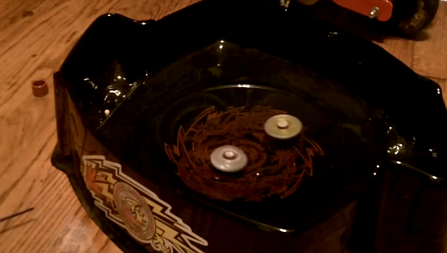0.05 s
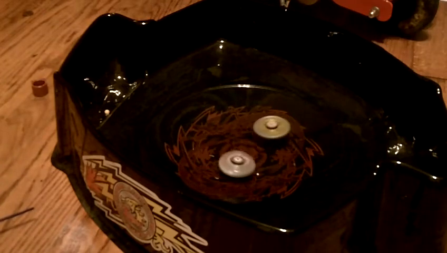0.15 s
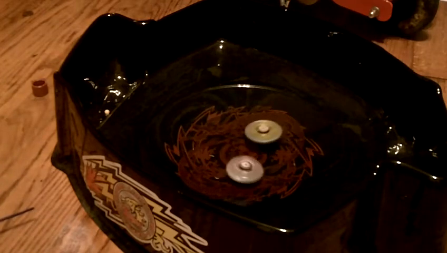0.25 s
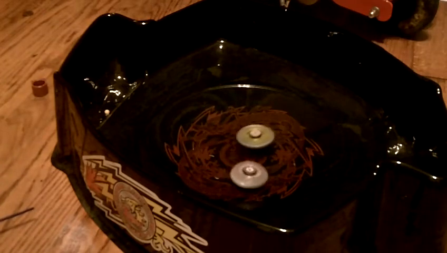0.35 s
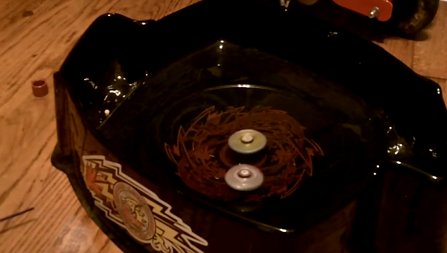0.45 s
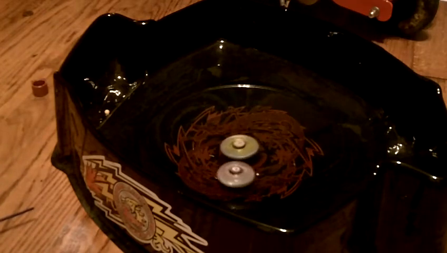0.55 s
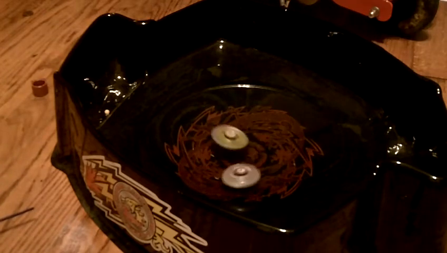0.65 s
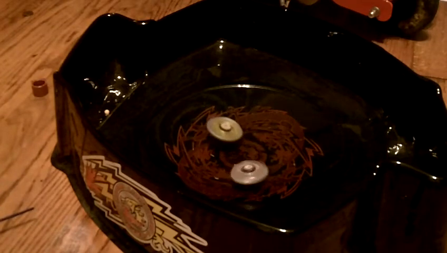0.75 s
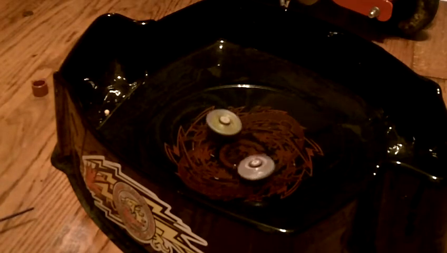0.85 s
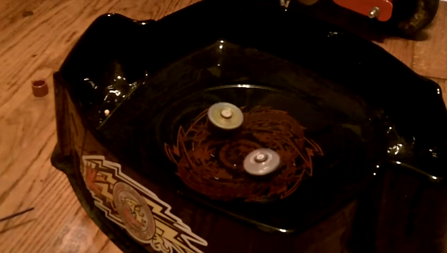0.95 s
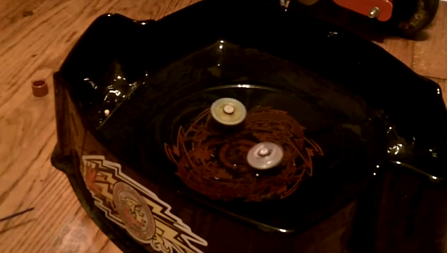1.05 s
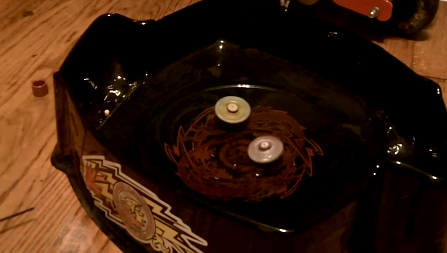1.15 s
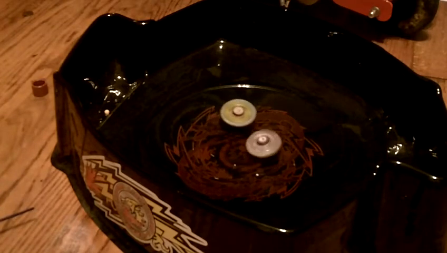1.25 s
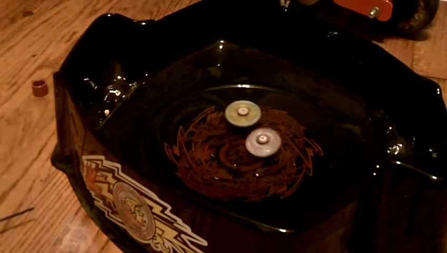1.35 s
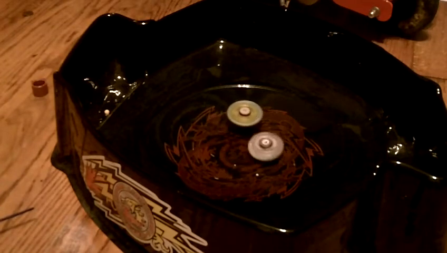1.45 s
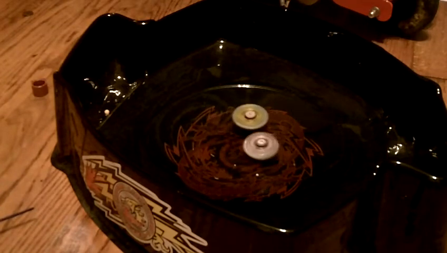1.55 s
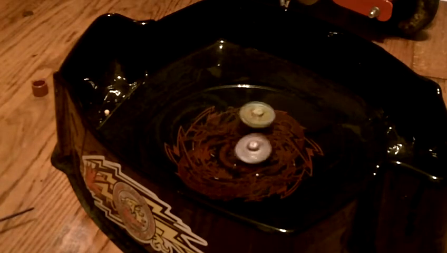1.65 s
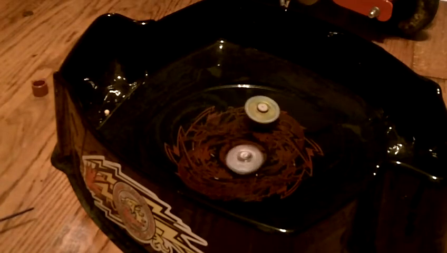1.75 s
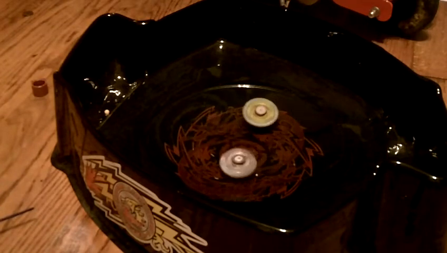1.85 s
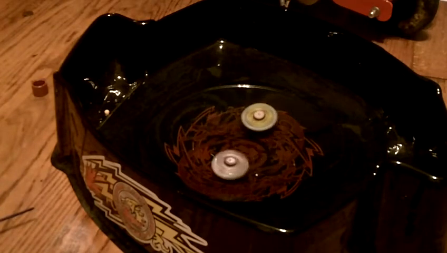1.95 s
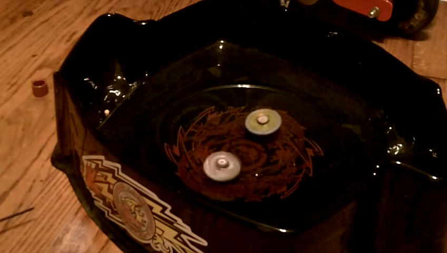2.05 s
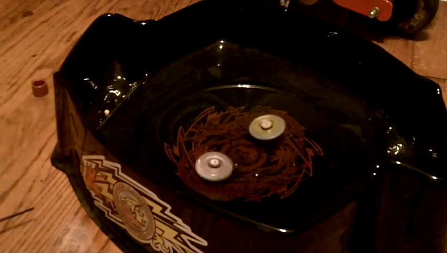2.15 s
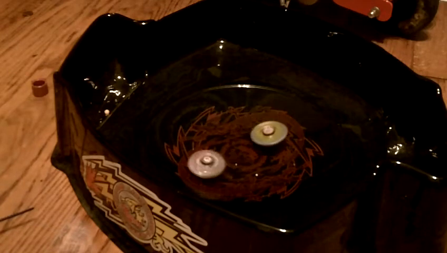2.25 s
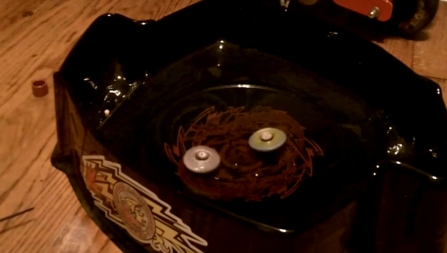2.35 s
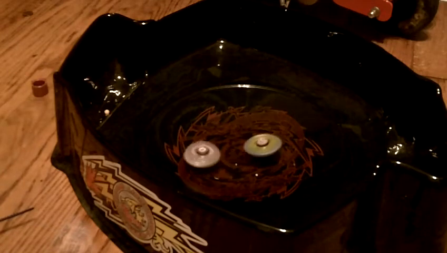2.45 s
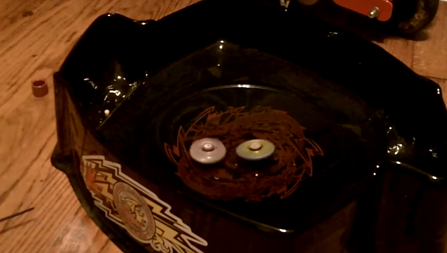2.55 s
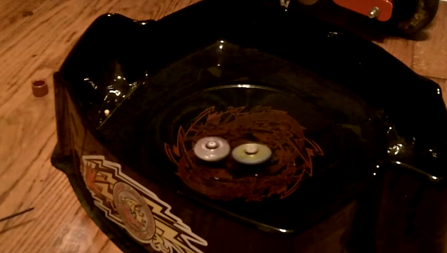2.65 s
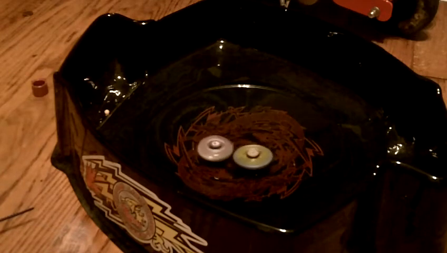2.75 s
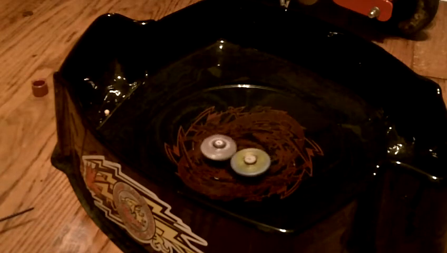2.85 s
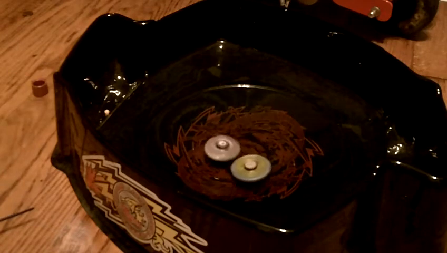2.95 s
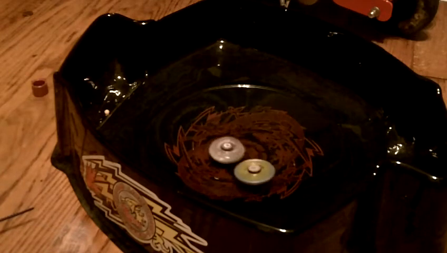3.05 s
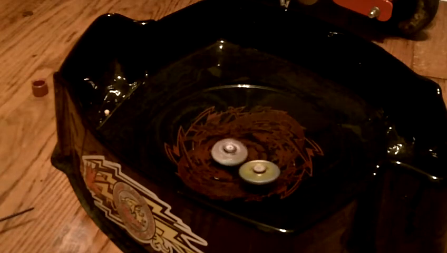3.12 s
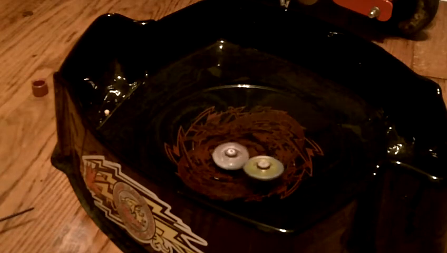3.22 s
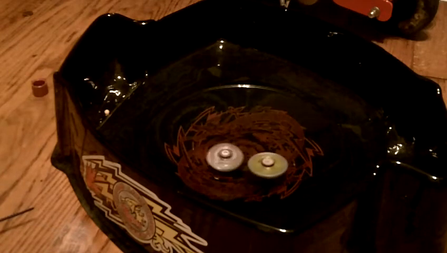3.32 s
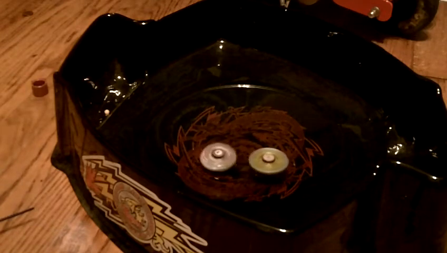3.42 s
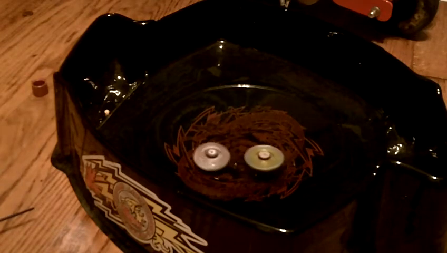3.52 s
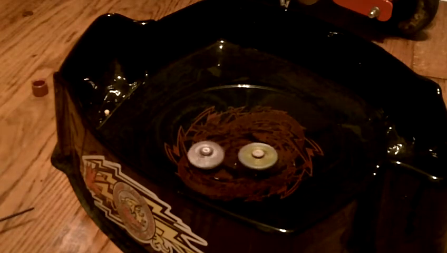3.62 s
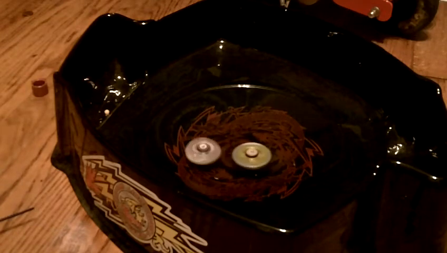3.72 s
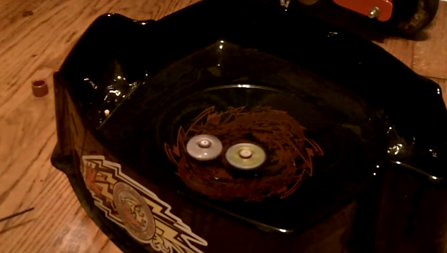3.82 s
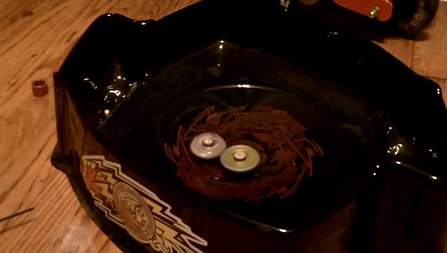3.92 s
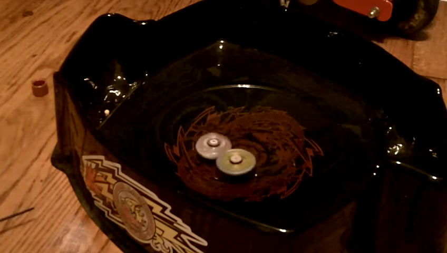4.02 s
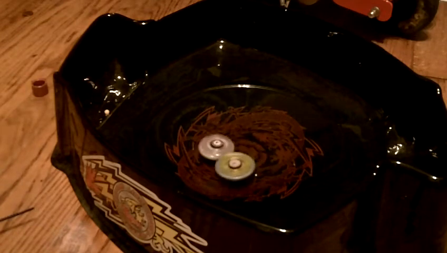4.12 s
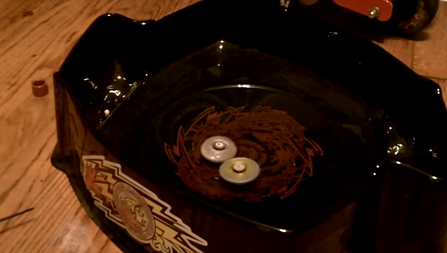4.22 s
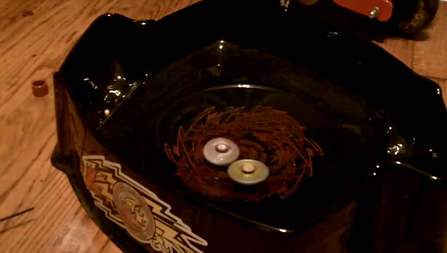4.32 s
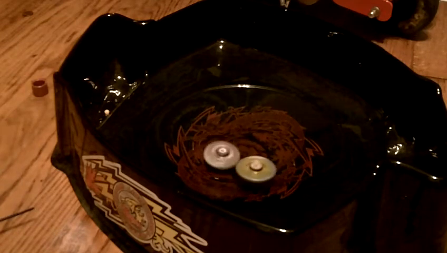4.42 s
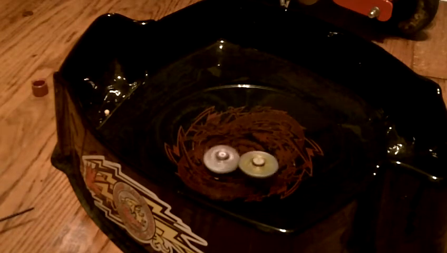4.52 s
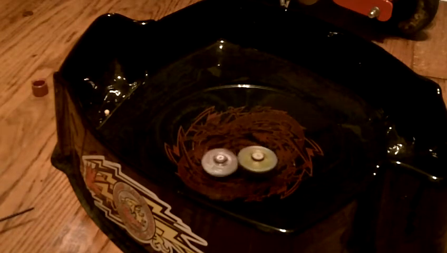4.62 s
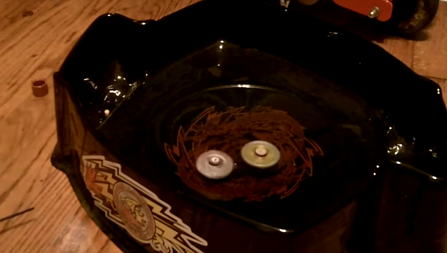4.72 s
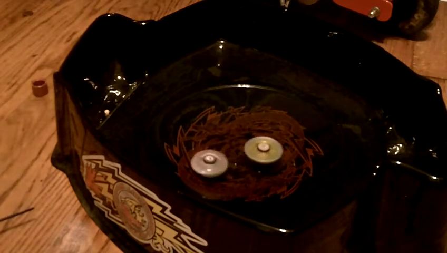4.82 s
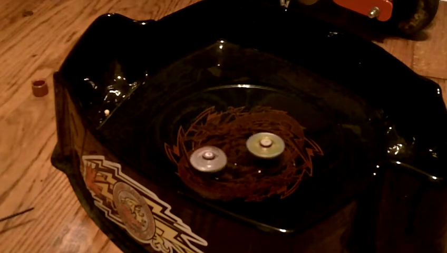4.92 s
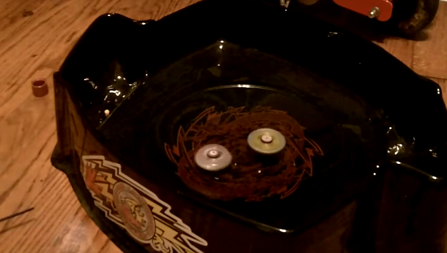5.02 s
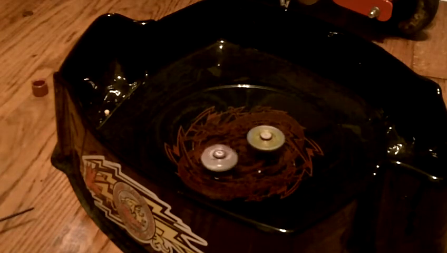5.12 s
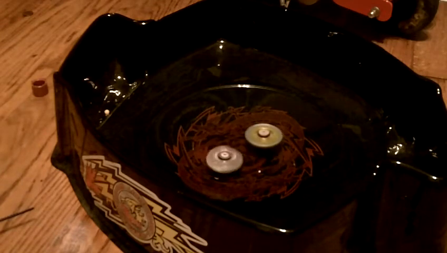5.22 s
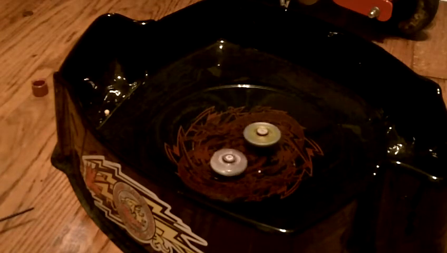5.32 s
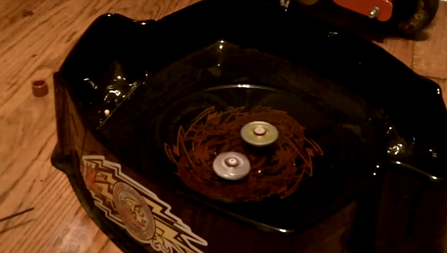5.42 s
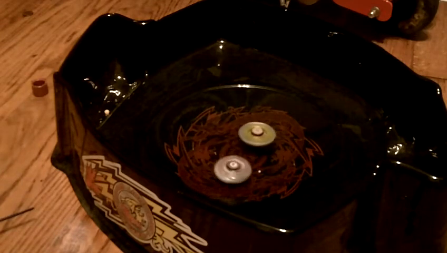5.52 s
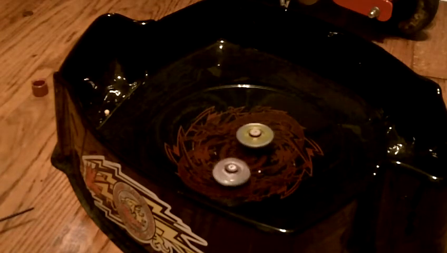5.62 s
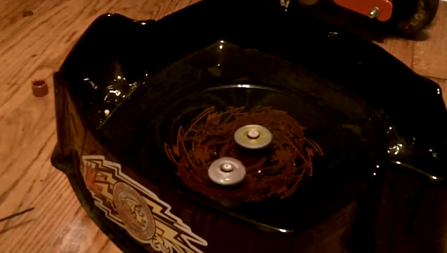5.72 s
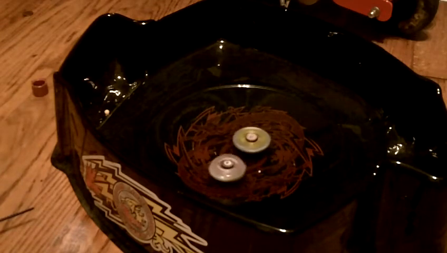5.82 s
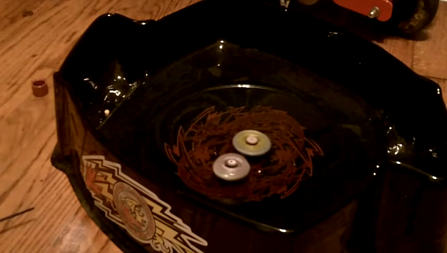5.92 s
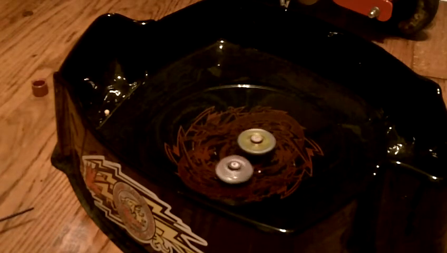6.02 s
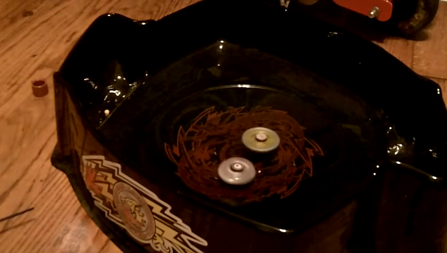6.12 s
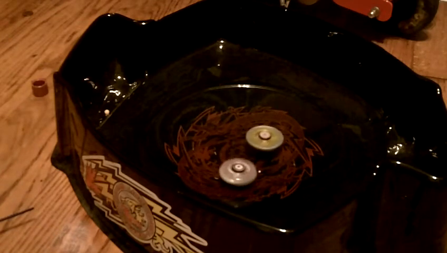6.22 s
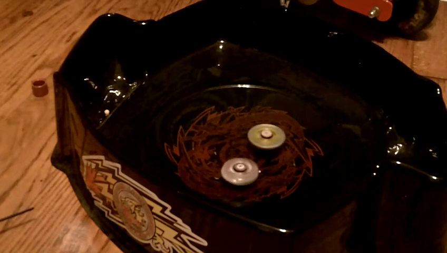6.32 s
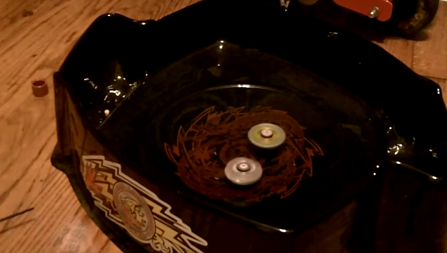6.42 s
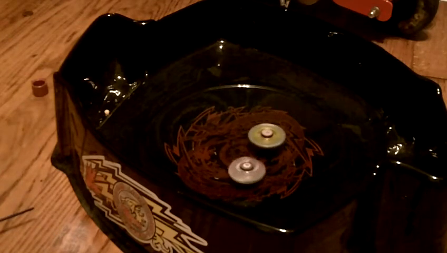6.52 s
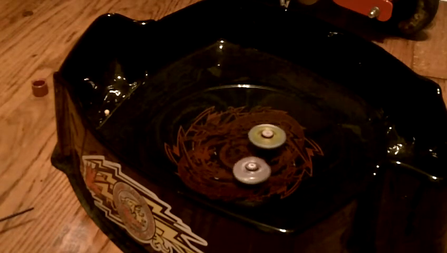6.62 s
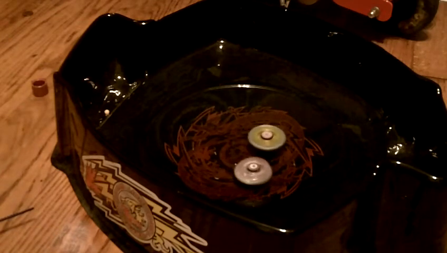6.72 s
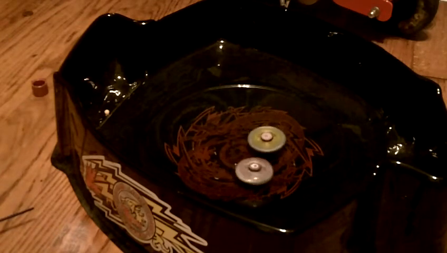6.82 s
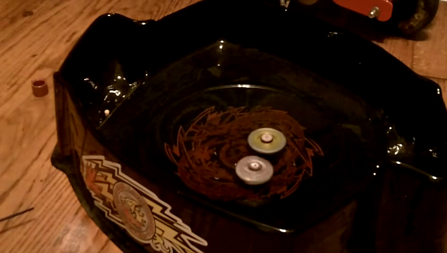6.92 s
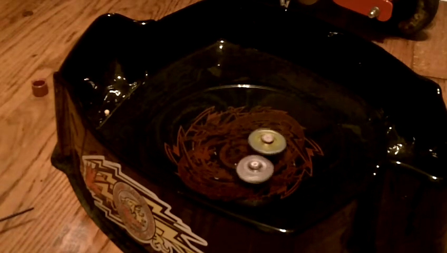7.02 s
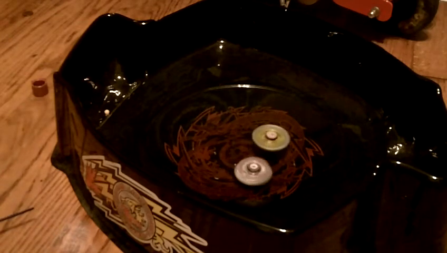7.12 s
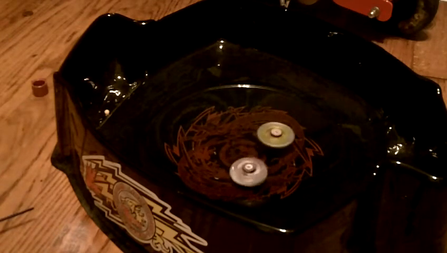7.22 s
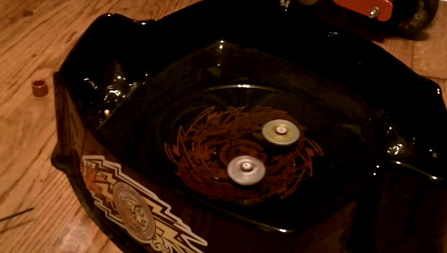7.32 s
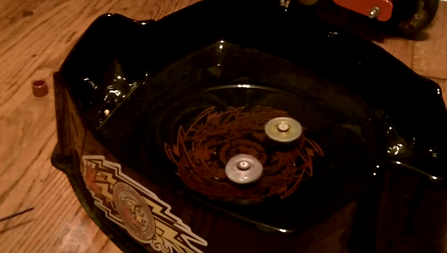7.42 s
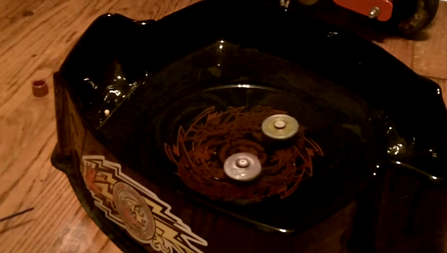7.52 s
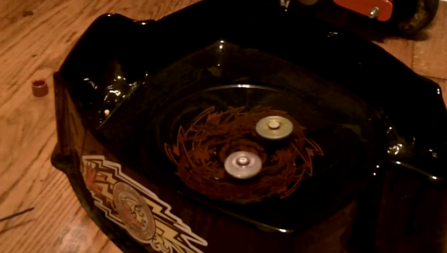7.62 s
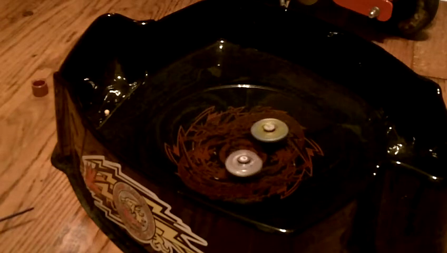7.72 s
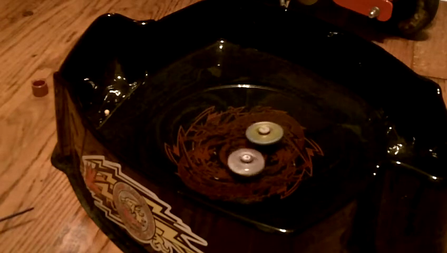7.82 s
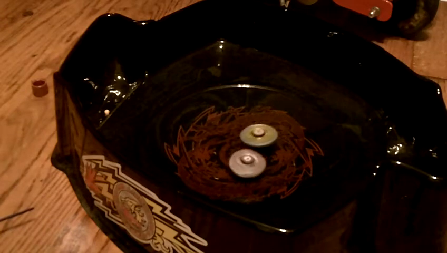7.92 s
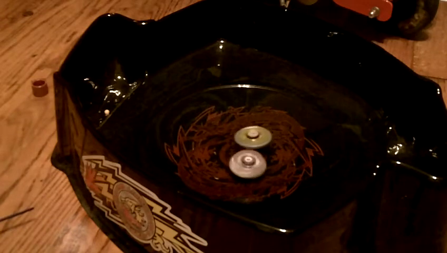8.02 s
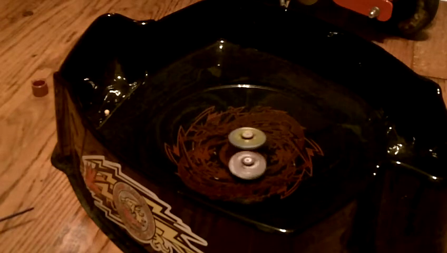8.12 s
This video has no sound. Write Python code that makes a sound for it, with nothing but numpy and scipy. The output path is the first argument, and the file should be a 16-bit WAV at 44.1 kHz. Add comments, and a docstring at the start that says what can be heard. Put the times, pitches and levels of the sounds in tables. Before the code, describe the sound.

Two metal spinning tops whirr and tick on a thin plastic arena, colliding repeatedly with sharp, ringing clacks as the whirr softens.

```python
"""In a thin plastic arena on a wooden floor, two metal tops spin close to a small camera.
Friction at their tips drives the modes of the arena, which scrapes, drums and ticks. When the rims
meet, the impact gives a clack, a metal ring of split modes and a hollow thud; a thrown top lands
again with duller knocks. Beneath lie room noise, house rumble and the camera's faint buzz."""
import sys
import numpy as np
from scipy import signal
from scipy.fft import rfft, irfft
from scipy.io import wavfile
from scipy.ndimage import uniform_filter1d

SR = 44100
rng = np.random.default_rng(int(sys.argv[2]) if len(sys.argv) > 2 else 0)


def unload_wav(signal):
    """Save mono or channel-first audio to the path in sys.argv[1] as 16-bit WAV at rate SR, clipped to [-1, 1]."""
    wavfile.write(
        sys.argv[1],
        SR,
        np.round(np.clip(np.atleast_2d(signal).T, -1, 1) * 32767).astype(np.int16),
    )


N = 359856

# high modes of the arena: pitch_hz, width_hz, level_db
ARENA_MODES = [(929, 200, -6), (1274, 76, -1), (1392, 92, -2.5), (1563, 42, 1), (1707, 240, -4.5),
               (2103, 600, -6), (3070, 480, -4.5), (3427, 290, -9.5), (3784, 460, -9.5), (4430, 790, -10.5),
               (5800, 340, -34.5)]
# louder catches of a tip on a ridge: start_s, level_db, low_over_high_db, low_hz, high_hz
LOUD_CATCHES = [(0.0423, -37.5, -9.5, 1440, 3640), (0.138, -44, -8, 1600, 3460),
                (0.256, -44, -2, 1470, 3000), (0.298, -47, 4, 1500, 3200), (0.3528, -42.5, -2, 1500, 3010),
                (0.4622, -43, -1.5, 1350, 4030), (0.5146, -39.5, -4.5, 1380, 2950),
                (0.5678, -45, 7, 1220, 3420), (0.8842, -42.5, -13, 1270, 3500),
                (0.9419, -33.5, -11, 1600, 3590), (1.02, -45, -2, 1570, 3250),
                (1.1313, -47, -2, 1580, 3910), (1.8594, -43.5, -1, 1480, 3130),
                (2.0328, -50, -4, 1720, 3240), (2.0812, -47, -3, 1750, 3470), (2.1114, -43, -2, 1550, 4400),
                (2.2625, -43, -1, 1570, 3000), (2.337, -43.5, -8, 1700, 3800),
                (2.4109, -46, -8, 1570, 3500), (2.6348, -52, 5, 1690, 3320),
                (3.0302, -39, -0.5, 1530, 4050), (3.1122, -47.5, 4, 1880, 3420),
                (3.5065, -41, 3, 1720, 3840), (3.5882, -48, 1.5, 1620, 4030),
                (3.8678, -44.5, -0.5, 1280, 3840), (3.9936, -48.5, 2, 1540, 4120),
                (4.2961, -44, -10, 1260, 4290), (4.5049, -46.5, -1, 1253, 3090),
                (4.81, -40, -3.5, 1726, 3240), (4.8894, -41.5, -1.5, 1550, 3290),
                (4.9677, -45.5, -5, 1535, 3360), (5.176, -47, 3.5, 1775, 3500),
                (5.4274, -49, 6, 1537, 3470), (5.463, -44, 2.5, 1594, 3200), (5.5374, -43, -1, 1535, 3230),
                (5.7556, -46, 0, 1457, 3730), (6.2707, -53, 5.5, 1553, 3950),
                (6.4987, -38, -2.5, 1512, 3100), (6.5906, -50, 4, 1530, 4120),
                (6.6091, -41.5, 1, 1430, 3870), (6.7194, -38, -3.5, 1528, 3020),
                (6.816, -43.5, -4, 1556, 2970), (6.9721, -47.5, -4, 1710, 3200),
                (7.2574, -46.5, -1, 1534, 3340), (7.3447, -41.5, -7, 1970, 3460),
                (7.4964, -47.5, -5, 1557, 4200), (7.6475, -45.5, -6, 1570, 3820),
                (7.7319, -43, -0.5, 1706, 3290), (7.7675, -42, -1, 1536, 4400),
                (8.106, -43.5, -3, 1203, 3300)]
# spin of the first top: time_s, turns_per_s
SPIN = [(0, 27), (8.16, 22)]
SPIN_RATIOS = (1, .83)  # the second top turns slower


def gain_of(db):
    return 10 ** (np.asarray(db) / 20)


def unit_rms(x):
    return x / np.sqrt(np.mean(x ** 2) + 1e-20)


def smoothed(noise, samples):
    return unit_rms(uniform_filter1d(noise, samples))


def add(mix, start_s, sound):
    part = mix[round(start_s * SR):][:len(sound)]
    part += sound[:len(part)]


def coloured(x, spectrum):
    """Spectral shaping by (frequency_hz, level_db) points, at unit rms."""
    points_hz, db = np.transpose(spectrum)
    hz = np.fft.rfftfreq(len(x), 1 / SR)
    gain = gain_of(np.interp(np.log(hz + 1), np.log(points_hz + 1), db))
    return unit_rms(irfft(rfft(x) * gain, len(x)))


def resonate(x, hz, width_hz):
    """Two-pole resonance of gain 1 at its centre."""
    return signal.lfilter(*signal.iirpeak(hz, hz / width_hz, SR), x)


def resonate_twice(x, hz, width_hz):
    return resonate(resonate(x, hz, width_hz), hz, width_hz)


def driven_modes(force, modes):
    """Forced vibration: modes superpose, neighbours in opposite phase."""
    return sum((-1) ** k * gain_of(db) * resonate(force, hz, width)
               for k, (hz, width, db) in enumerate(modes))


def free_modes(modes, t, spread_db):
    """Free vibration: damped sines whose strengths vary with the point of impact."""
    offsets_db = spread_db * rng.standard_normal(len(modes))
    return sum(gain_of(db + offset - 60 * t / t60) * np.sin(2 * np.pi * hz * t)
               for (hz, db, t60), offset in zip(modes, offsets_db))


def decay(t, t60, rise_s):
    return (1 - np.exp(-t / rise_s)) * gain_of(-60 * t / t60)


def room_noise():
    """Steady coloured noise: the hush of the room and the rumble of the house."""
    # noise spectra: frequency_hz, density_db
    hush_spectrum = [(47, -15), (80, 3.5), (422, -17.5), (1000, -16), (1560, -15.5), (2720, -30),
                     (3100, -44.5), (4830, -24), (5520, -42.5), (6310, -24.5), (7870, -40.5),
                     (14600, -32.5), (16000, -62)]
    rumble_spectrum = [(12, -9.5), (20, 8.5), (24, 16.5), (30, -12), (38, -8), (48, 3.5), (60, 6),
                       (72, -5.5), (110, -49)]
    hush = gain_of(-61) * coloured(rng.standard_normal(N), hush_spectrum)
    return hush + gain_of(-56.5) * coloured(rng.standard_normal(N), rumble_spectrum)


def camera_buzz():
    """A periodic impulse train: tiny bright clicks from the camera's electronics."""
    clicks_per_s = 59.96
    clicks = np.diff(np.floor(np.arange(N + 1) / SR * clicks_per_s + .06))
    return gain_of(-46) * resonate_twice(clicks, 7600, 5565)


def tip_whirr():
    """Friction noise: each tip drags unevenly once a turn and drives the arena's high and low modes."""
    # tips on the plastic: time_s, scrape_db, drum_db
    levels = [(0.0, -51, -52.5), (0.43, -55, -54), (0.79, -51, -48.5), (1.18, -59, -53), (1.7, -58.5, -56),
              (2.07, -57.5, -53.5), (2.86, -55, -54), (3.05, -61, -53.5), (3.95, -63, -62.5),
              (4.43, -61, -53), (4.61, -60.5, -57.5), (5.29, -60.5, -61), (6.84, -67, -62.5),
              (7.14, -58, -56.5), (7.66, -64, -63), (8.16, -63, -59)]
    # low modes of the arena: pitch_hz, width_hz, level_db
    bowl_modes = [(97, 12, 0.5), (121.4, 14, 6), (217.3, 18.2, 0), (230.1, 20, -1.5), (359, 35, -7.5),
                  (436.4, 52, -11), (546, 47, -9), (672.5, 53, -12.5)]
    t = np.arange(N) / SR
    speed = np.interp(t, *np.transpose(SPIN))
    drag = np.full(N, .8)
    for ratio in SPIN_RATIOS:
        jitter = 1 + .15 * smoothed(rng.standard_normal(N), 3000)
        turns = np.cumsum(speed * ratio * jitter) / SR
        strength = gain_of(6 * rng.standard_normal(400))[turns.astype(int) % 400]
        drag += strength * np.exp(-(turns % 1) / .241)
    grit = rng.standard_normal((2, N))
    scrape = unit_rms(sum(gain_of(db) * resonate_twice(drag * grit[0], hz, 1.615 * width)
                          for hz, width, db in ARENA_MODES))
    drum = unit_rms(driven_modes(uniform_filter1d(drag, 400) * grit[1], bowl_modes))
    times, scrape_db, drum_db = np.transpose(levels)
    return gain_of(np.interp(t, times, scrape_db)) * scrape + gain_of(np.interp(t, times, drum_db)) * drum


def faint_catches():
    """Chance contact: on most turns a tip catches lightly. Rows as in LOUD_CATCHES."""
    chance_per_turn, clearance_s = .8, .015
    speed = np.interp(np.arange(N) / SR, *np.transpose(SPIN))
    whole_turns = [np.floor(np.cumsum(speed * ratio) / SR) for ratio in SPIN_RATIOS]
    starts = np.concatenate([np.flatnonzero(np.diff(turns)) / SR for turns in whole_turns])
    draws, spreads = rng.random((len(starts), 4)), rng.standard_normal((len(starts), 2))
    loud_starts = np.transpose(LOUD_CATCHES)[0]
    catches = []
    for start, (hit, late, low, high), (loud, deep) in zip(starts, draws, spreads):
        if hit < chance_per_turn and abs(loud_starts - start).min() > clearance_s:
            low_hz = ARENA_MODES[(1, 3, 3, 4)[int(4 * low)]][0]
            high_hz = 3000 + 1500 * high ** 2
            catches.append((start + .008 * late, -54.5 + 3 * loud, .5 + 2.4 * deep, low_hz, high_hz))
    return catches


def tip_ticks():
    """Impulsive excitation: each catch rings a low and a high patch of plastic; some squeak."""
    ticks, scuffs = np.zeros((2, N))
    t = np.arange(SR // 8) / SR
    for start, db, low_db, low_hz, high_hz in list(LOUD_CATCHES) + faint_catches():
        burst = rng.standard_normal(len(t)) * (decay(t, .013, .00043) + .21 * decay(t, .13, .0035))
        low = resonate_twice(burst, low_hz, 106) + .36 * resonate_twice(burst, low_hz, 710)
        high = resonate_twice(burst, high_hz, 330) + .5 * resonate_twice(burst, 3853, 1700)
        high += .095 * resonate_twice(burst, 6450, 900)
        add(ticks, start, gain_of(db) * (high / abs(high).max() + gain_of(low_db) * low / abs(low).max()))
        scuff_db = db - 29 - 1.5 * start + 3 * rng.exponential()  # weaker as the tops slow
        add(scuffs, start, gain_of(scuff_db) * rng.standard_normal(len(t)) * decay(t, .081, .0018))
    squeaks = gain_of(26.5) * resonate_twice(scuffs, 8660, 170.6)
    return ticks + squeaks


def clack(t, snap_db, treble_db, t60):
    """Brief contact gives a broadband snap; damping takes the treble first from its rattling tail."""
    # spectrum of the contact: frequency_hz, density_db
    spectrum = [(880, -35), (1500, -15), (2240, -14.5), (4740, 2), (5960, 1.5), (8550, -2.5), (10100, -0.5),
                (12400, -4.5), (14700, -10), (16400, -37)]
    tilted = [(hz, db + treble_db * np.clip(np.log2(hz / 5000), 0, 1)) for hz, db in spectrum]
    noise = rng.standard_normal((3, len(t)))
    bright = coloured(noise[0], tilted)
    snap = gain_of(snap_db) * bright * (decay(t, .013, .0003) + 1.3 * decay(t, .0029, .0002))
    rattle = gain_of(2.2 * smoothed(noise[1], 130))
    peaks = gain_of(2.7 * smoothed(noise[2, :len(t) // 2 + 1], 60))  # many small resonances
    resonant = unit_rms(irfft(rfft(bright) * peaks, len(t)))
    dull = signal.lfilter([.45], [1, -.55], resonant)
    tail = .51 * resonant * decay(t, .68 * t60, .0015) + 1.27 * dull * decay(t, t60, .0025)
    return snap + rattle * tail


def top_ring(t, first_db, second_db, body_db):
    """Modal ringing of both rims and bodies; the ring of a spinning, rattling rim wavers."""
    # modes of the metal rims, pairs split by the spin: pitch_hz
    rim_hz = [4084, 4367, 4429, 4533, 4598, 4657, 4782, 6772, 8613, 4984, 4045, 10295, 10377]
    # the same modes: level_db, t60_s
    rim_decays = [(-8.5, .15), (-3.5, 0.329), (-1, 0.34), (-15, 0.18), (-2.5, .3), (-1, .36), (-17, .14),
                  (-11, .15), (-14.5, 0.2), (-19, .12), (-12.5, 0.17), (-7, 0.14), (-30.5, 0.091)]
    # short modes of the bodies: pitch_hz, level_db, t60_s
    body_modes = [(2060, -5, 0.057), (3340, -6, 0.22), (3880, -9, 0.081), (4015, 6, 0.055),
                  (4490, -2, 0.24), (4690, -8, 0.06), (6510, 6.5, 0.063), (10270, -14, 0.067),
                  (11300, -1.5, 0.046), (12600, -17.5, .05)]
    second_top_modes = (3, 4, 5, 6, 9)
    rim_modes = [(hz, db + (second_db if k in second_top_modes else first_db), t60)
                 for k, (hz, (db, t60)) in enumerate(zip(rim_hz, rim_decays))]
    waver = 1 + .31 * smoothed(rng.standard_normal(len(t)), 200)
    rims = waver * free_modes(rim_modes, t, spread_db=.6)
    return rims + gain_of(body_db) * free_modes(body_modes, t, spread_db=1)


def impacts():
    """Collisions and landings set the tops ringing and force a thud and a knock from the arena."""
    # rims meeting: start_s, level_db, then relative to that level:
    # snap_db, first_rim_db, second_rim_db, treble_db, thud_db, knock_db, body_db
    collisions = [(0.6164, -31, 16.3, -14, -17, -8.5, 3.5, -7.5, -8),
                  (0.632, -27.5, 14, -7, -6, 1.5, -2, -20, -10),
                  (1.3745, -31, 14.4, -2.5, 5, -11, -11, -8.5, -4.5),
                  (1.6724, -33, 13.5, -9, 1.5, -7, -4.5, -14, -3.5),
                  (2.6765, -30.5, 13.6, 11.5, 9, -1.5, -14, -10, -13.5),
                  (2.8568, -32, 14.3, -14, -8.5, -11, -9.5, -8, -12.5),
                  (3.308, -34, 11, -15, -9, -5, -7.5, -6.5, -4.5),
                  (4.147, -38, 13, -14, -17, -11.5, -8.5, -10.5, 0),
                  (4.681, -37, 7.5, -16, -19, -9, -7.5, -6, -3.5),
                  (5.9659, -37, 10, -13, -8, -15, -5.5, -10, -1.5),
                  (7.0673, -34.5, 15.4, -9.5, -3.5, -9, -6.5, -7.5, -4),
                  (8.1256, -48, 14.5, -3, -5, -10.5, -4.5, -4.5, -2.5)]
    # a thrown top landing on its tip: start_s, level_db, relative thud_db, relative knock_db
    landings = [(0.6747, -34, 3, -3.5), (0.7224, -39, -5, 4.5), (0.7544, -46.5, -9, -5),
                (0.7755, -58, -2, 0), (0.819, -56, -1, 3), (1.7107, -34.5, 4, 1), (1.7557, -39.5, -7, 1.5),
                (1.7732, -42.5, 3.5, 1), (2.9054, -42, -0.5, 3), (7.0879, -38, -7.5, -4.5)]
    # modes of the arena on the floorboards: pitch_hz, width_hz, level_db
    thud_modes = [(95, 58, -6.5), (130.3, 15, 2), (204.7, 23, 0), (236.4, 43, -5.5), (293, 24, -10.5),
                  (378, 27, -9), (429.6, 24, -7.5), (546, 56, -12.5), (638.4, 67, -12)]
    collision_t60, landing_t60 = .26, .18
    blows = [(*row, collision_t60) for row in collisions]
    blows += [(start, db, 10, -23, -23, -29.5, thud_db, knock_db, -14, landing_t60)  # little ring or treble
              for start, db, thud_db, knock_db in landings]
    tops, thud_force, knock_force = np.zeros((3, N))
    t = np.arange(SR // 2) / SR
    for start, db, snap_db, first_db, second_db, treble_db, thud_db, knock_db, body_db, t60 in blows:
        push = rng.standard_normal(len(t)) * (decay(t, .21, .014) + .703 * decay(t, .034, .002))
        rap = rng.standard_normal(len(t)) * (decay(t, .0137, .0019) + .25 * decay(t, t60, .011))
        add(thud_force, start, gain_of(db + thud_db) * push)
        add(knock_force, start, gain_of(db + knock_db) * rap)
        add(tops, start, gain_of(db) * clack(t, snap_db, treble_db, t60))
        add(tops, start, gain_of(db) * top_ring(t, first_db, second_db, body_db))
    arena = driven_modes(thud_force, thud_modes) + driven_modes(knock_force, ARENA_MODES[:6])
    return tops + gain_of(28.5) * arena


def scene():
    """Superposition of all sources in one channel."""
    return (impacts() + tip_ticks() + tip_whirr() + room_noise() + camera_buzz())[None]


def record(dry):
    """Linear filtering: four fixed, deep notches colour the whole sound; a low-pass limits the band."""
    # notches in the spectrum: centre_hz, width_hz, depth_db
    notches = [(2730, 275, -49), (5456, 1000, -34.5), (7825, 1620, -41), (11140, 190, -33)]
    hz = np.fft.rfftfreq(4096, 1 / SR)
    log_gain = 0
    for centre, width, db in notches:
        detuning = (hz - centre) ** 2
        log_gain += np.log((detuning + (width * gain_of(db)) ** 2) / (detuning + width ** 2)) / 2
    cepstrum = irfft(log_gain)
    cepstrum[1:2048] *= 2  # folding makes the response causal
    cepstrum[2049:] = 0
    response = irfft(np.exp(rfft(cepstrum)))
    notched = signal.oaconvolve(dry, response[None])[:, :N]
    low_pass = signal.firwin(511, cutoff=16450, window=("kaiser", 9), fs=SR)
    return signal.oaconvolve(notched, low_pass[None], "same")


dry = scene()
out = record(dry)
unload_wav(out)
```